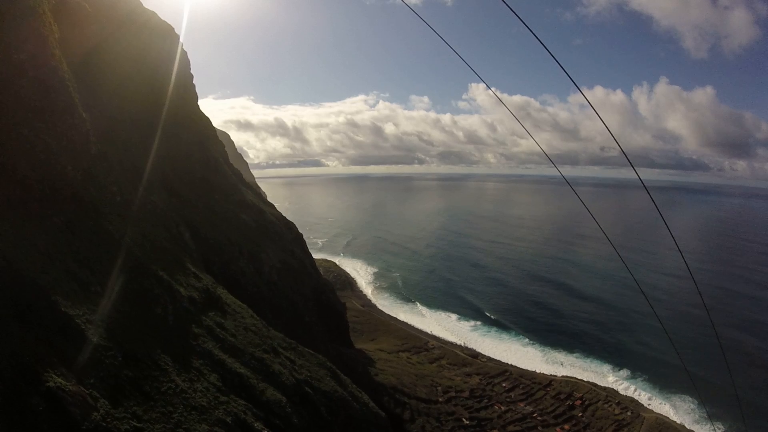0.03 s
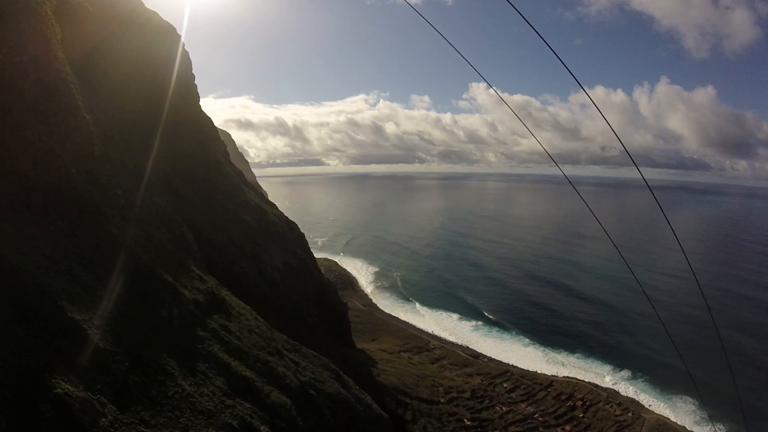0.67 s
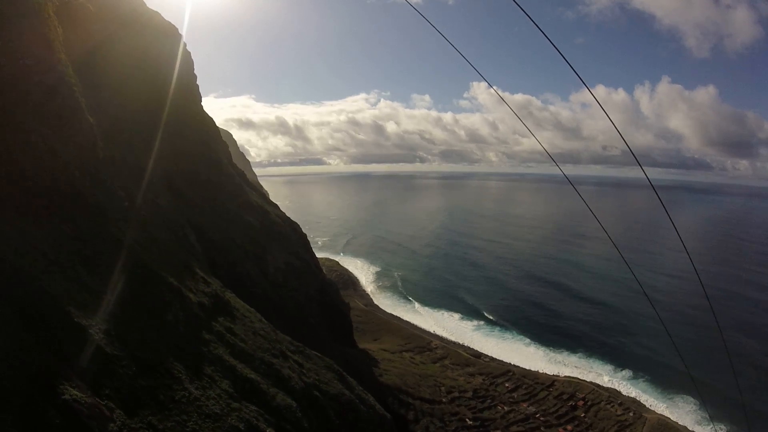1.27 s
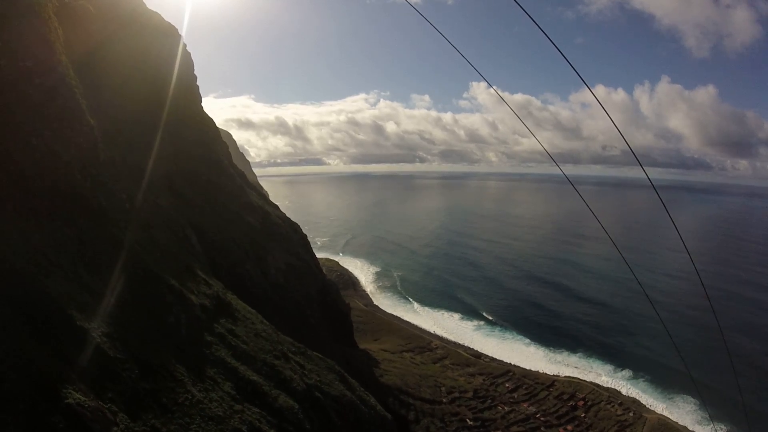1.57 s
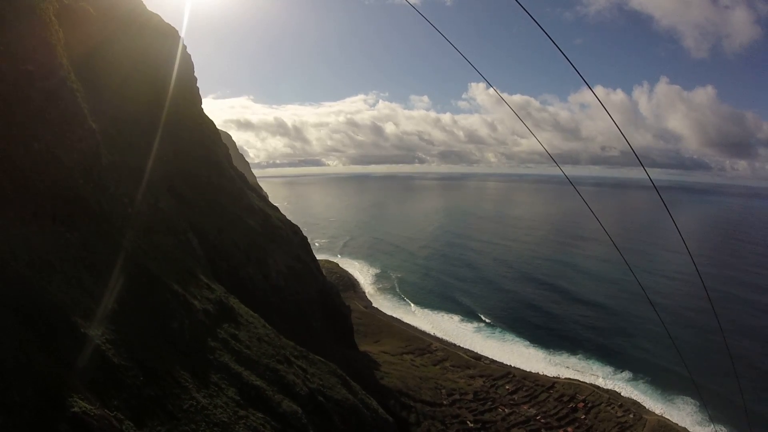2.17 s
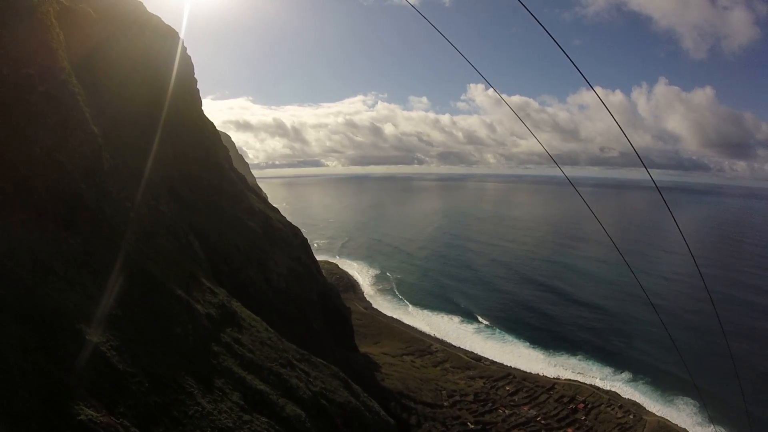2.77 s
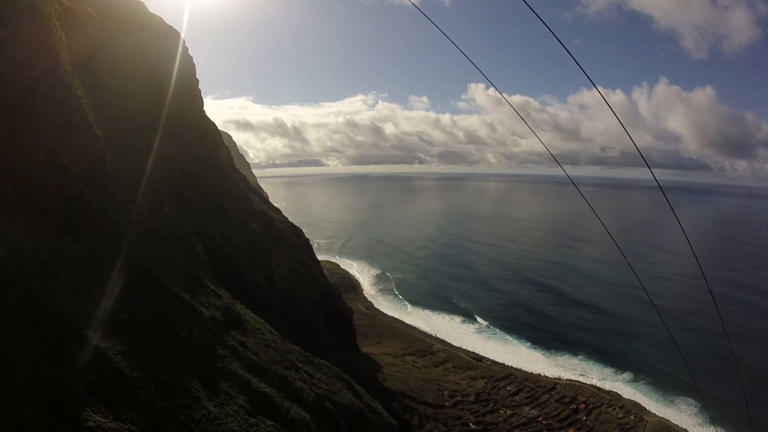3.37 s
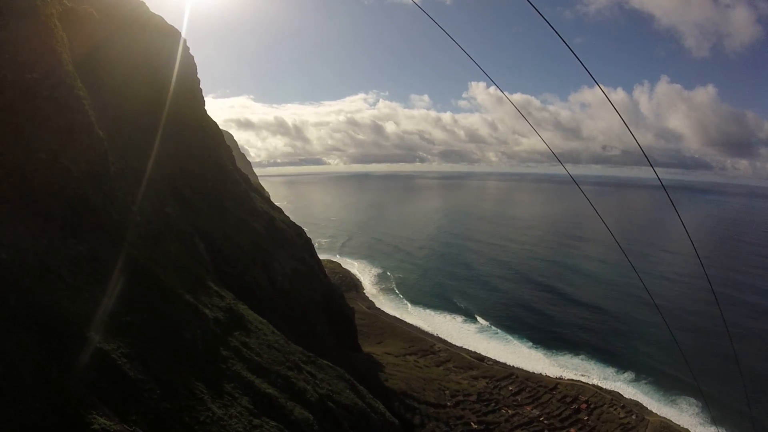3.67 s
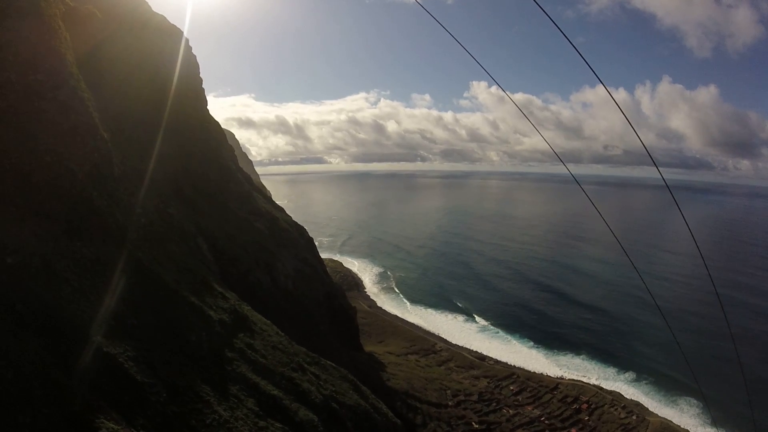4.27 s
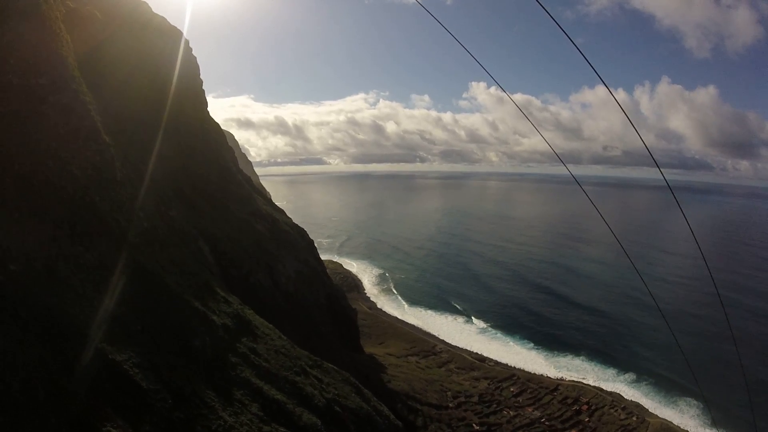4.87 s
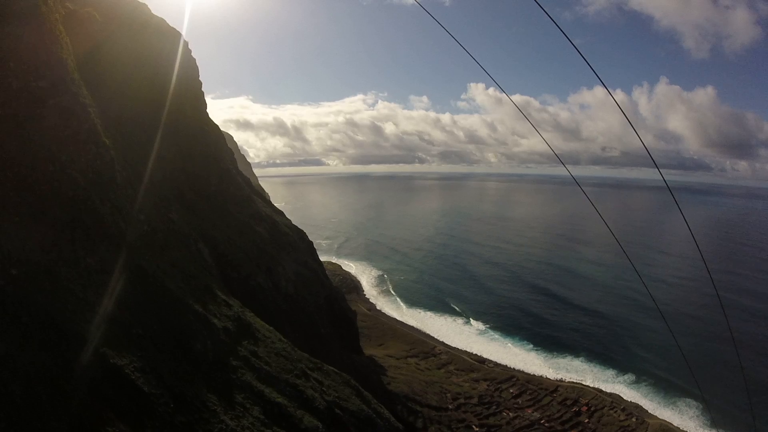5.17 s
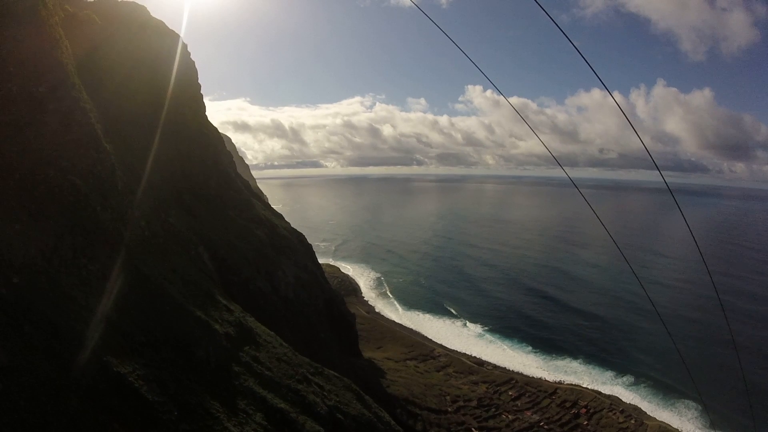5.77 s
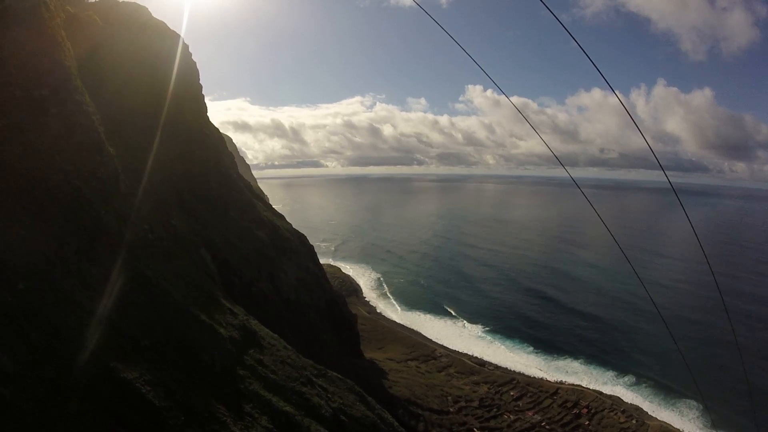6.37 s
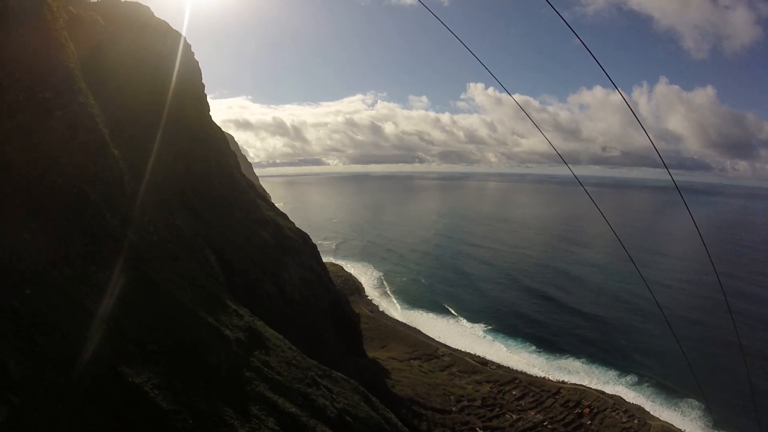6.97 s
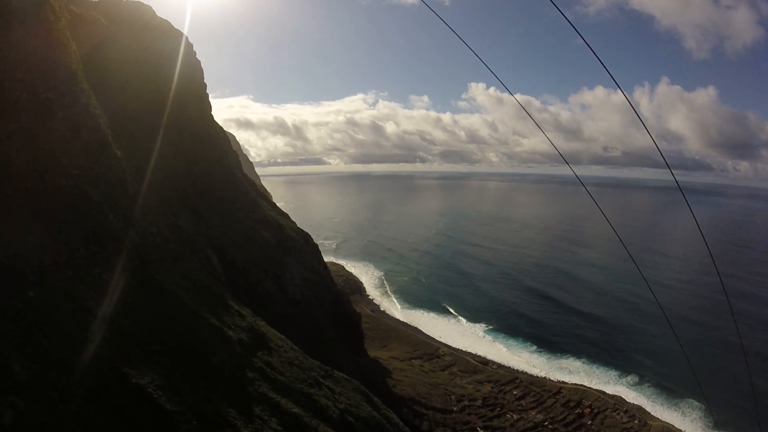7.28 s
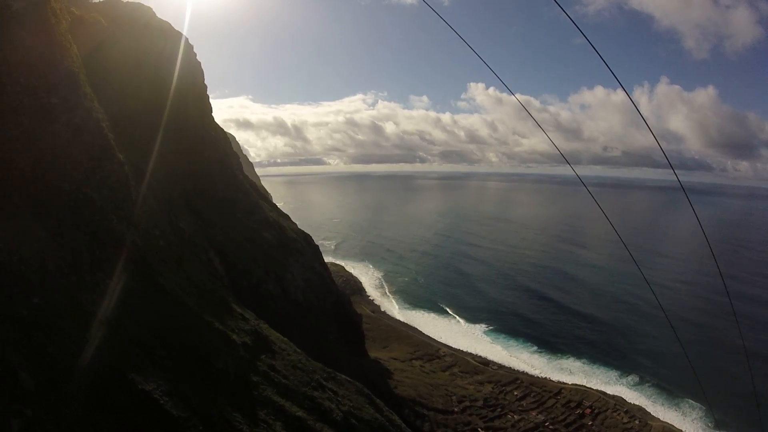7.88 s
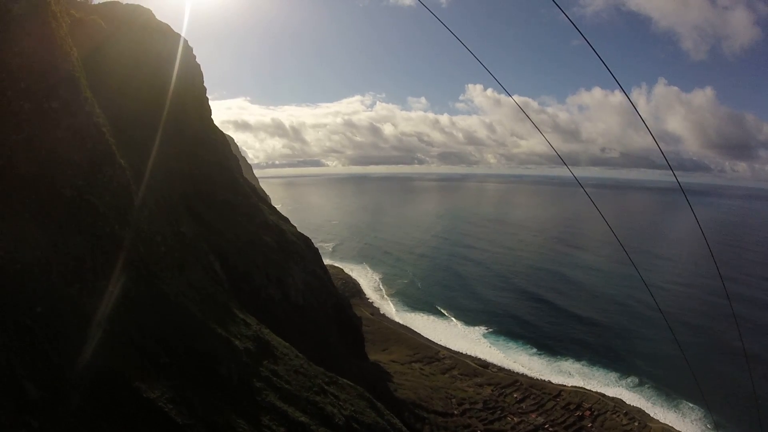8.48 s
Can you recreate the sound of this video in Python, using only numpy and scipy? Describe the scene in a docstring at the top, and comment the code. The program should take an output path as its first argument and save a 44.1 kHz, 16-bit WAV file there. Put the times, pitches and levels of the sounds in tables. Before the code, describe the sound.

Heard from inside a moving cable car, a deep rumble and a very low throb run throughout, rising and falling slightly with gusts. The cable hums on one low pitch, a little louder at the start, the middle and the end, while the running gear sings faintly above it. Muffled jolts nudge the cabin at irregular moments over a quiet, smooth hiss of air.

```python
"""A low hum over a deep rumble, heard inside a cable car cabin gliding along at constant speed.
The running cable sends the hum through the hanger; it swells about every four seconds, with two
fainter tones of the running gear above it. The cabin shudders on its suspension, gusts and soft
jolts stir its panels and the air inside, and an even hiss of passing air lies behind."""
import sys
import numpy as np
from scipy import signal
from scipy.fft import rfft, irfft, next_fast_len
from scipy.io import wavfile

SR = 44100
rng = np.random.default_rng(int(sys.argv[2]) if len(sys.argv) > 2 else 0)


def unload_audio(sound):
    """Save the sound as a 16-bit wav file, at the path given as the first command line argument."""
    columns = np.transpose(np.atleast_2d(sound))
    # keep every value between -1 and 1, then stretch to whole-number steps
    steps = np.round(np.clip(columns, -1, 1) * 32767)
    wavfile.write(sys.argv[1], SR, steps.astype(np.int16))


N = 376173

# tone colour of the cabin's panels: frequency_hz, relative_db
PANEL_SPECTRUM = [(22, -26), (28, -6), (40, -1.5), (54, 0.5), (66, 1), (74, -3.5), (84, -1.9), (92, -7),
                  (102, -4), (112, -12.5), (126, -12.5), (140, -17), (152, -16.5), (172, -22.5),
                  (195, -30.5), (300, -40), (600, -80.5)]


def undb(db):
    """Decibels to gain."""
    return 10 ** (np.asarray(db) / 20)


def curve(points):
    """An envelope of straight lines through (time_s, value) points."""
    return np.interp(np.arange(N) / SR, *np.transpose(points))


def humps(middles_s, lengths_s, heights):
    """Smooth rises and falls centred on the given times, summed."""
    away = (np.arange(N)[:, None] / SR - middles_s) / lengths_s
    return (heights * np.cos(np.pi * np.clip(away, -.5, .5)) ** 2).sum(axis=1)


def noise(gain_at):
    """Noise of rms 1 whose spectrum follows a function of frequency."""
    size = next_fast_len(N)
    hz = np.arange(1, size // 2 + 2) * SR / size
    x = irfft(rfft(rng.standard_normal(size)) * gain_at(hz), size)[:N]
    return x / x.std()


def coloured(points):
    """Noise of rms 1 shaped by (frequency_hz, relative_db) points, rolling off below the first."""
    hz, db = np.transpose(points)
    return noise(lambda f: undb(np.interp(np.log(f), np.log(hz), db)) * np.minimum(f / hz[0], 1) ** 2)


def resonance(hz, width_hz):
    """A steep resonance shaken at random."""
    return noise(lambda f: 1 / (1 + ((f / hz - hz / f) * hz / width_hz) ** 2))


def walk(rate_hz):
    """Slow random drift of spread 1, moving at up to about rate_hz."""
    return noise(lambda f: 1 / (1 + (f / rate_hz) ** 2))


def tone(phase, flutter, rate_hz):
    """A tone of rms about 1 that wavers in level and phase."""
    wave = (1 + flutter * walk(rate_hz)) * np.sin(phase) + flutter * walk(rate_hz) * np.cos(phase)
    return wave / np.sqrt(1 / 2 + flutter ** 2)


def cable_swell(rise_s=1.43, hold_s=0.23, fall_s=0.66):
    """The hum's lift above its resting level, in dB: slow rise, short hold, quicker fall."""
    # swells about four seconds apart: crest_s, rise_db
    swells = [(0.1, 6), (4.08, 4), (8.15, 4)]
    t = np.arange(N) / SR
    corners_s = [-rise_s, 0, hold_s, hold_s + fall_s]
    return sum(db * np.interp(t - crest_s, corners_s, [0, 1, 1, 0]) for crest_s, db in swells)


def cable_hum(pitch_hz=170.8, rest_db=-39.5, drift_hz=0.18, beat_hz=4.1, waver_s=0.36):
    """Cable strands run over the sheaves: a nearly pure hum, a weak tone beating with it, an octave."""
    # brief dips and lifts of the hum: middle_s, change_db
    wavers = [(1.12, -3), (1.45, -2.2), (1.8, -0.5), (2.6, -2.5), (3.32, 2.5), (4.2, 0.5), (5.0, -3),
              (5.25, 0.5), (5.95, -3), (6.24, -3), (7.6, 1)]
    # the octave comes and goes: time_s, level_db
    octave_levels = [(0.3, -64), (1.1, -74), (1.8, -60.5), (2.3, -68), (5.3, -66), (6.2, -63), (8.3, -61.5)]
    middles_s, changes_db = np.transpose(wavers)
    level_db = rest_db + cable_swell() + humps(middles_s, waver_s, changes_db)
    phase = 2 * np.pi * np.cumsum(pitch_hz + drift_hz * walk(1.32)) / SR
    neighbour_phase = phase - 2 * np.pi * beat_hz * np.arange(N) / SR
    neighbour = undb(-17.5) * tone(neighbour_phase, flutter=0.66, rate_hz=1.5)
    fundamental = tone(phase, flutter=0.066, rate_hz=15.0)
    octave = undb(curve(octave_levels)) * tone(2 * phase, flutter=0.43, rate_hz=5.0)
    return undb(level_db) * (fundamental + neighbour) + octave


def running_gear():
    """The running gear sings faintly above the hum, its tones ringing up and fading unevenly."""
    # tones of the gear: pitch_hz, base_level_db, flutter_share
    gear_tones = [(261.7, -60, 0.37), (311, -71.5, 0.3)]
    # gain on both tones, rising early in the ride, then easing: time_s, gain_db
    gear_gain = [(1.9, -0.5), (2.6, 5.5), (3.3, 2.5), (5.7, 4), (6.2, 2), (8.5, 4)]
    t = np.arange(N) / SR
    tones = 0
    for hz, db, flutter in gear_tones:
        phase = 2 * np.pi * hz * t + 0.68 * walk(1.1)
        tones += undb(db) * tone(phase, flutter, rate_hz=8.2)
    return tones * undb(curve(gear_gain))


def cabin_shudder(pitch_hz=25.4, rest_db=-33.5, drift_hz=1.258):
    """The whole cabin shakes in its lowest mode: an uneven sub-bass throb that wanders in pitch."""
    # surges of shaking on the hanger: middle_s, length_s, rise_db
    surges = [(0.25, 0.84, 3), (0.82, 0.34, 3), (1.467, 0.18, 7.5), (2.005, 0.22, 8), (4.26, 0.33, 10),
              (4.613, 0.78, 4), (5.39, 0.24, 8), (6.23, 0.28, 7), (7.043, 0.55, 7), (8.28, 0.29, 6.5)]
    level_db = rest_db + humps(*np.transpose(surges))
    phase = 2 * np.pi * np.cumsum(pitch_hz + drift_hz * walk(4.08)) / SR
    return undb(level_db) * tone(phase, flutter=0.26, rate_hz=6.2)


def panel_rumble(buffet_db=0.78):
    """Wind buffets the panels into a deep rumble that rises and falls with the gusts."""
    # the nearly steady bed of rumble: time_s, base_level_db
    rumble_bed = [(0, -34), (2.1, -34), (3.1, -34), (4.4, -35), (5.2, -33.7), (6.4, -34), (7.3, -34),
                  (8.5, -33.5)]
    # gusts and lulls on the panels: middle_s, length_s, change_db
    gusts = [(0.423, 0.37, 1.5), (0.76, 0.16, -3.5), (1.0, 0.21, 4.5), (1.843, 0.33, 1), (2.07, 0.12, 3),
             (2.46, 0.13, 2.5), (2.767, 0.22, -3.5), (3.1, 0.43, -1.5), (3.458, 0.69, 2.5),
             (3.825, 0.12, -2), (4.048, 0.23, -4.5), (4.295, 0.3, 5), (4.565, 0.18, 4.5),
             (5.49, 0.16, -2.5), (5.76, 0.3, 2.5), (6.218, 0.24, -3.5), (6.366, 0.18, 1.5),
             (6.765, 0.46, -4.5), (7.11, 0.22, -0.5), (7.447, 0.43, -2.5), (8.36, 0.36, 2)]
    level_db = curve(rumble_bed) + humps(*np.transpose(gusts)) + buffet_db * walk(3.3)
    return coloured(PANEL_SPECTRUM) * undb(level_db)


def air_modes(tilt_db_per_octave=0):
    """The air in the cabin rings in its modes; an upward tilt brightens it."""
    # resonances of the enclosed air: pitch_hz, width_hz, relative_db
    modes = [(243.2, 58, 0.5), (276, 39, -7), (335, 50, -4), (397.5, 41, -7), (494, 170, -11)]
    lowest_hz = modes[0][0]
    return sum(undb(db + tilt_db_per_octave * np.log2(hz / lowest_hz)) * resonance(hz, width_hz)
               for hz, width_hz, db in modes)


def cabin_boom(gain_db=-60.5, swell_share=0.6):
    """The enclosed air booms softly throughout, partly following the cable's swell."""
    return air_modes() * undb(gain_db + swell_share * cable_swell())


def passing_air(level_db=-55.5):
    """Air slides past the cabin: a smooth hiss that barely stirs."""
    # tone colour of the hiss: frequency_hz, relative_db
    hiss_spectrum = [(100, 1), (300, 0), (470, -1), (650, -2.5), (900, -5), (1400, -7.5), (2100, -9.5),
                     (3000, -13), (5000, -18.5), (7000, -23), (10000, -29), (12600, -33), (13100, -41),
                     (15000, -42)]
    return coloured(hiss_spectrum) * undb(level_db + 0.22 * walk(1.6))


def hanger_jolts(attack_s=0.014, decay_s=0.036):
    """Soft jolts come through the hanger, each a brighter boom in the air and a thud in the panels."""
    # the jolts: start_s, boom_gain_db, thud_level_db
    jolts = [(0.59, -55, -46), (1.0, -58, -42), (2.42, -55, -36), (3.18, -55, -52), (3.32, -52, -33),
             (3.64, -55, -46), (4.3, -61, -41), (4.62, -57, -41), (5.678, -55, -27), (6.38, -54, -34),
             (6.54, -55, -49), (7.0, -56.5, -44), (7.55, -53.5, -43), (8.03, -54.5, -41),
             (8.23, -53.5, -44)]
    starts_s, boom_db, thud_db = np.transpose(jolts)
    age_s = np.arange(N)[:, None] / SR - starts_s
    envelopes = np.clip(age_s / attack_s, 0, 1) * np.exp(-np.maximum(age_s - attack_s, 0) / decay_s)
    booms = air_modes(tilt_db_per_octave=5) * (envelopes @ undb(boom_db))
    thuds = coloured(PANEL_SPECTRUM) * (envelopes @ undb(thud_db))
    return booms + thuds


def scene():
    """The mono mix, as heard from a seat in the cabin."""
    machinery = cable_hum() + running_gear()
    cabin = cabin_shudder() + panel_rumble() + cabin_boom() + hanger_jolts()
    return (machinery + cabin + passing_air())[None]


def record(dry, top_hz=15150, fade_s=0.006):
    """A steep low-pass trims the highest treble; short fades keep both ends free of clicks."""
    t = np.arange(N) / SR
    fade = np.minimum(np.minimum(t, t[::-1]) / fade_s, 1)
    lowpass = signal.ellip(10, .05, 60, top_hz, fs=SR, output="sos")
    return fade * signal.sosfiltfilt(lowpass, dry)


dry = scene()
out = record(dry)
unload_audio(out)
```